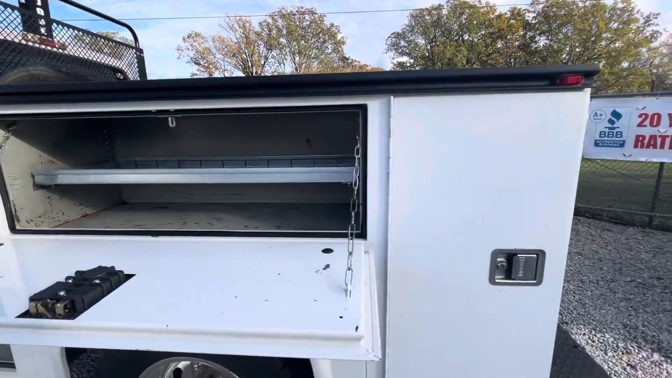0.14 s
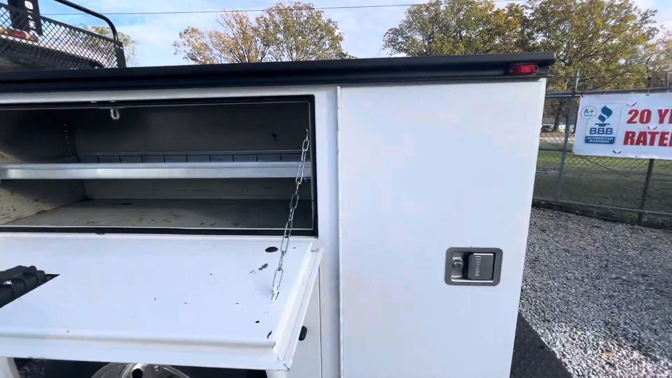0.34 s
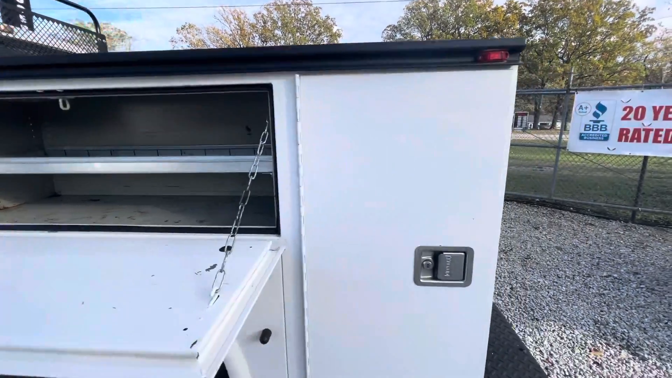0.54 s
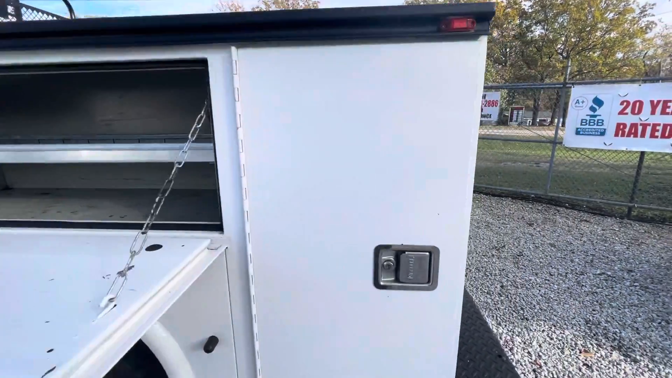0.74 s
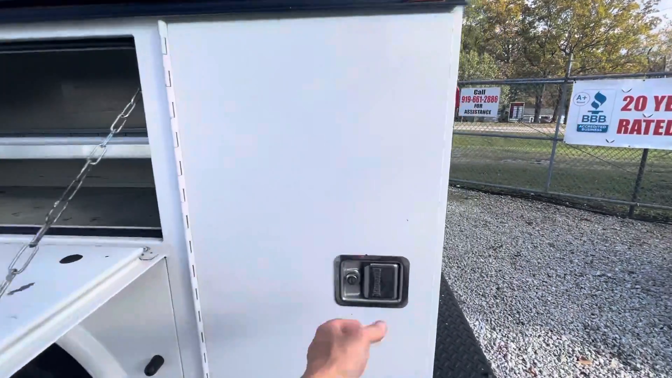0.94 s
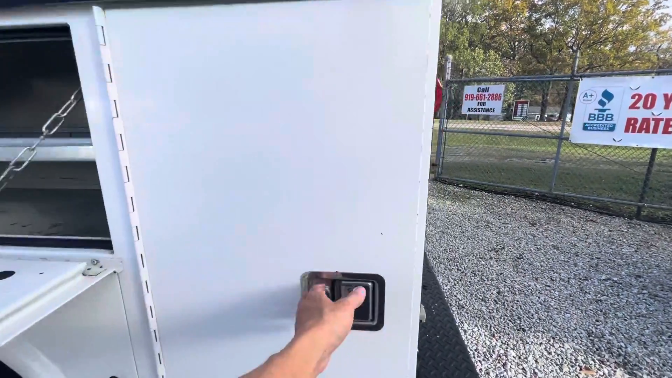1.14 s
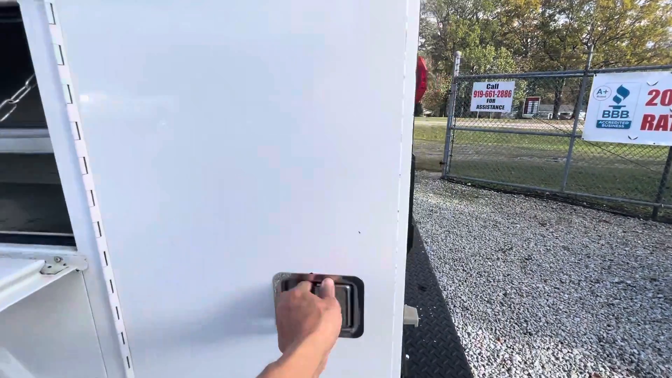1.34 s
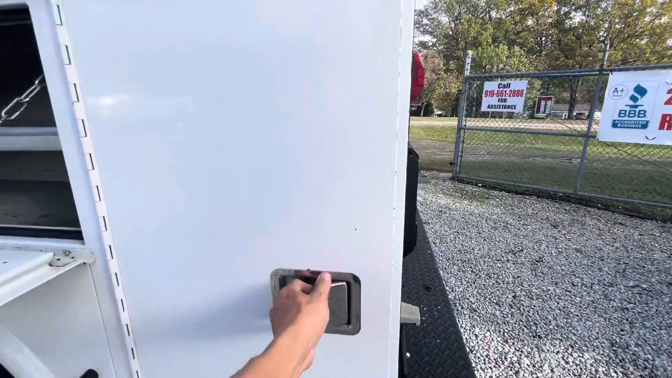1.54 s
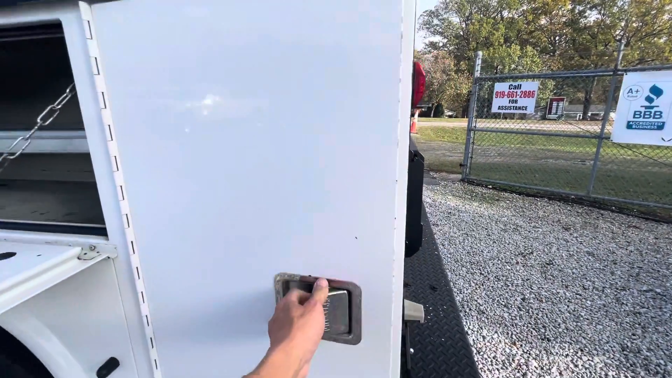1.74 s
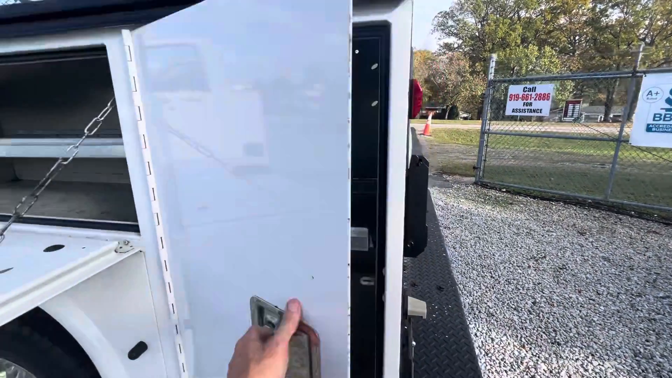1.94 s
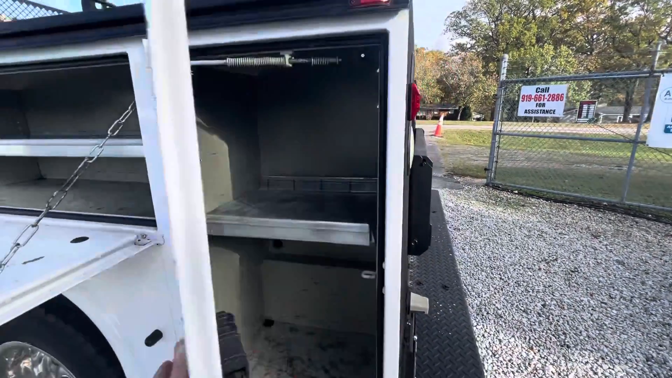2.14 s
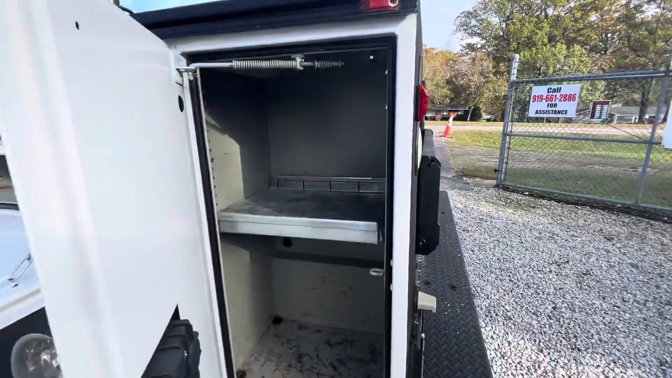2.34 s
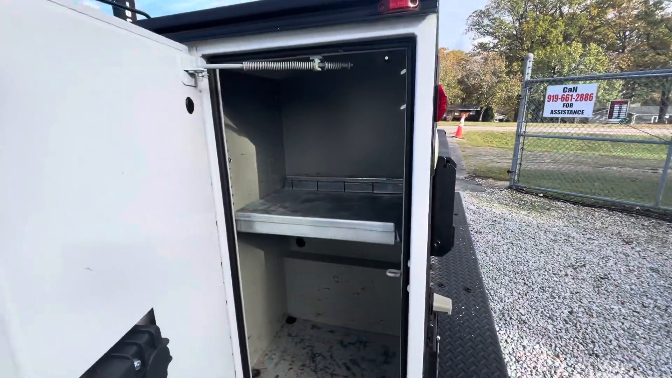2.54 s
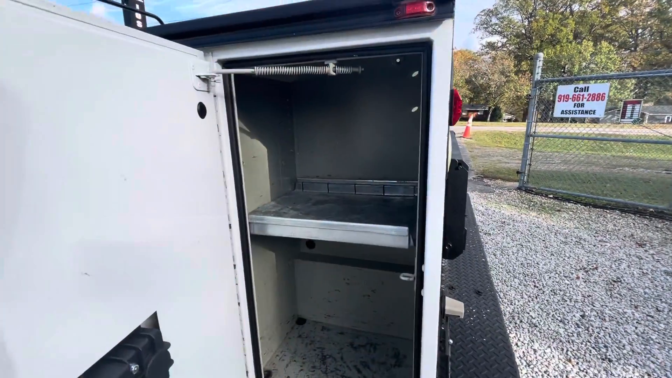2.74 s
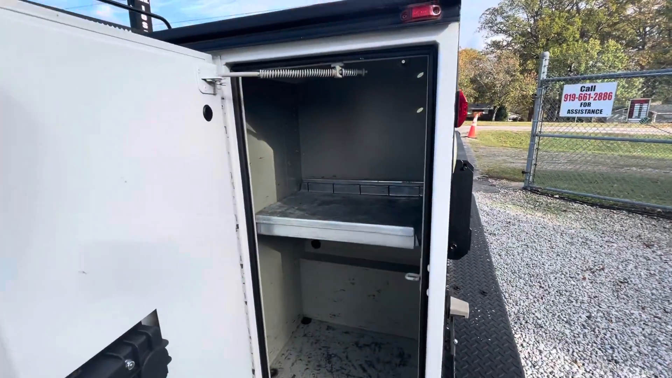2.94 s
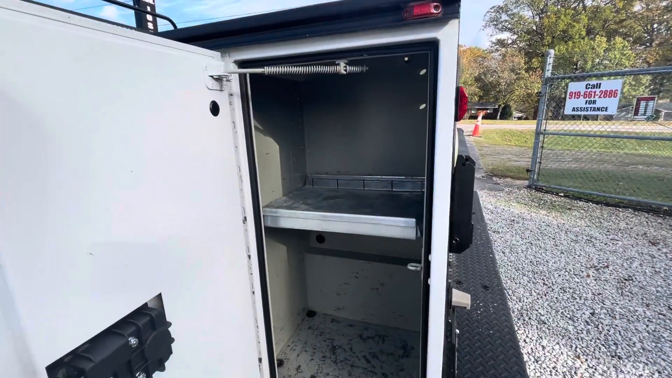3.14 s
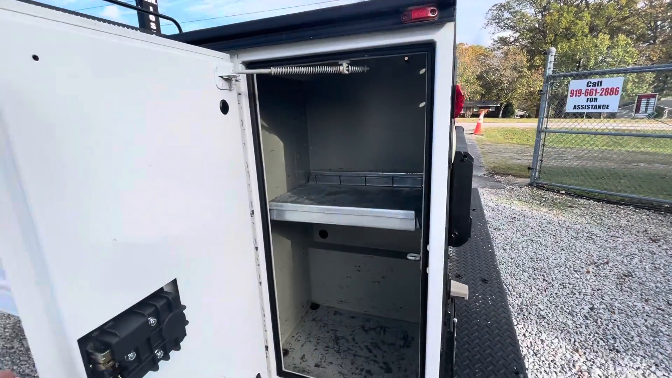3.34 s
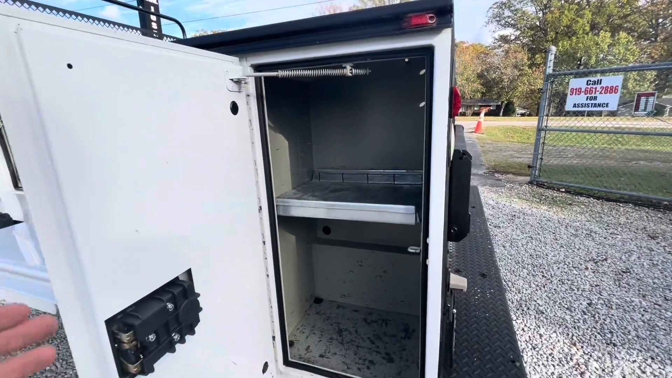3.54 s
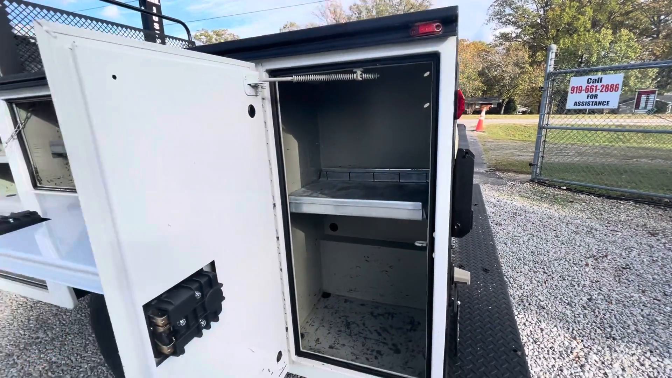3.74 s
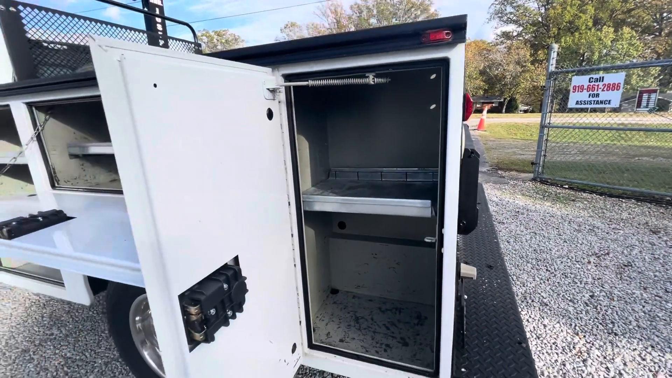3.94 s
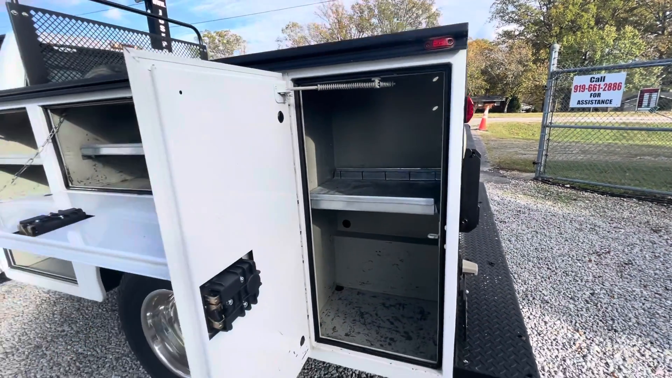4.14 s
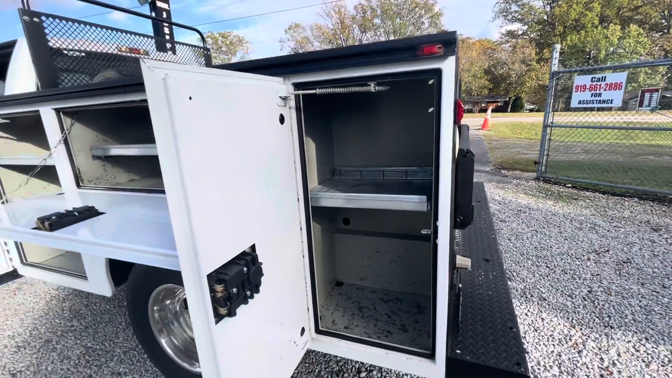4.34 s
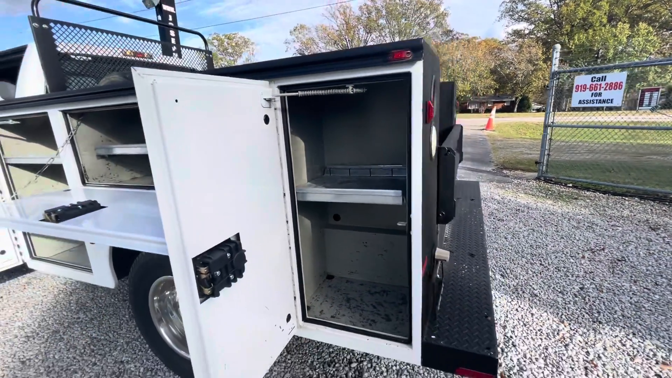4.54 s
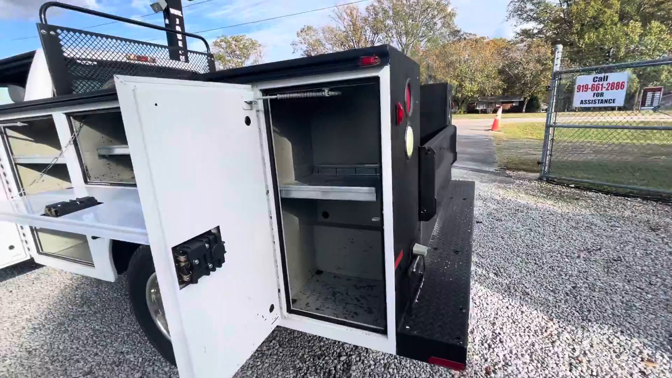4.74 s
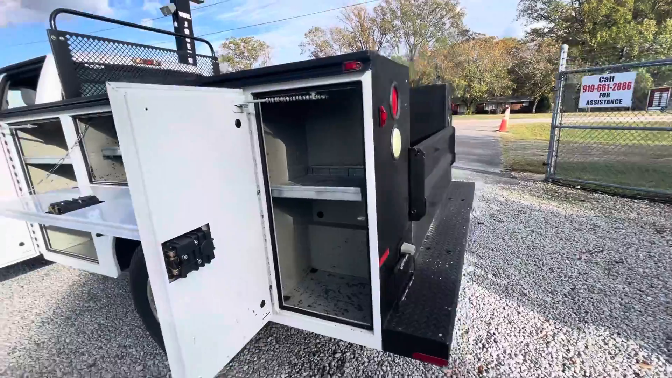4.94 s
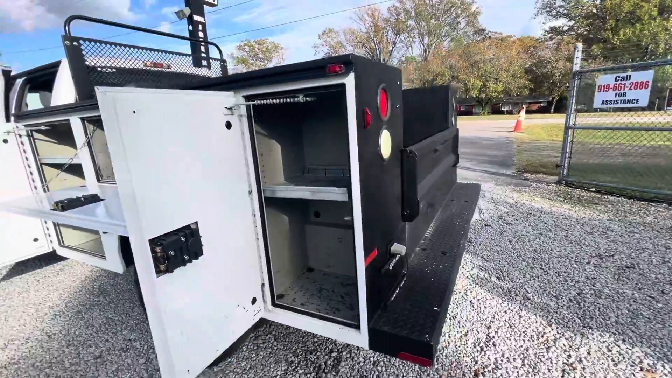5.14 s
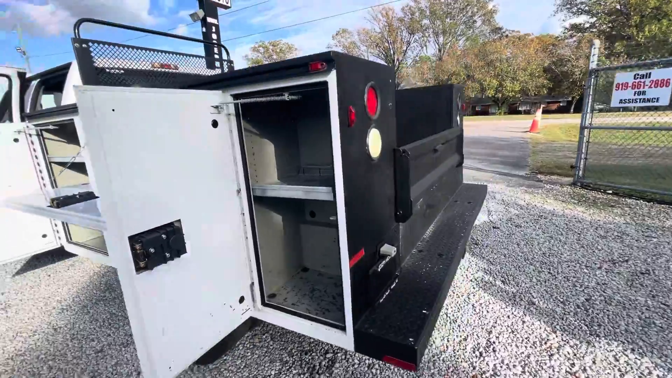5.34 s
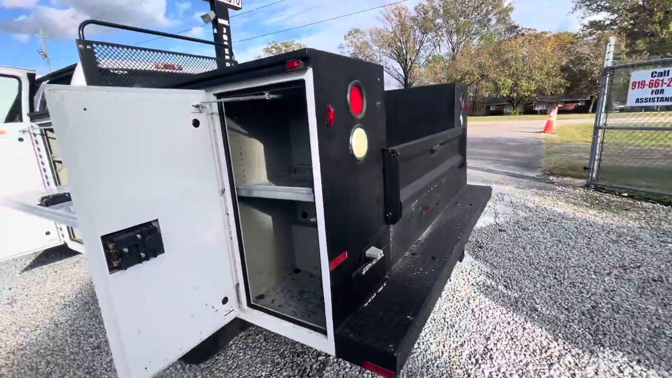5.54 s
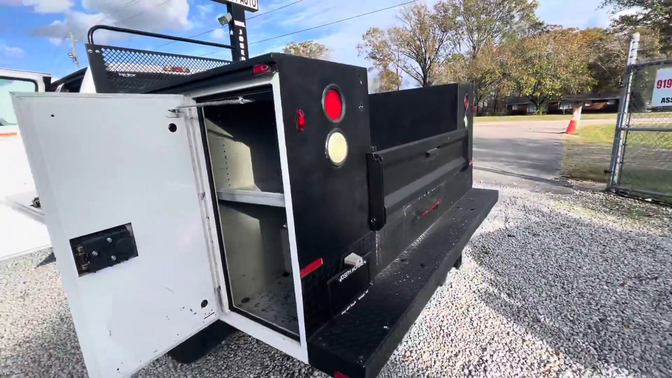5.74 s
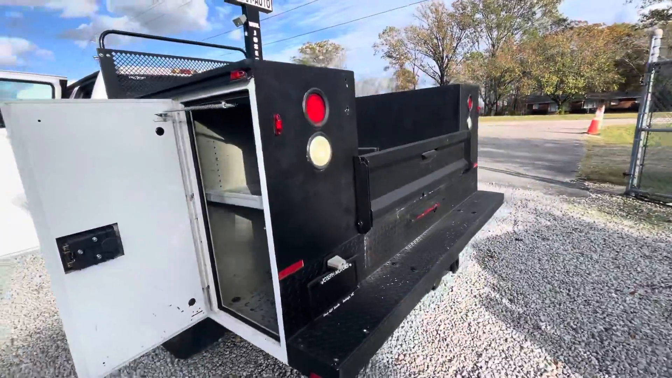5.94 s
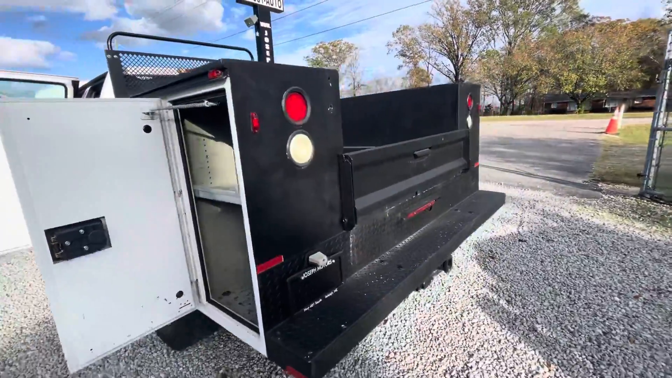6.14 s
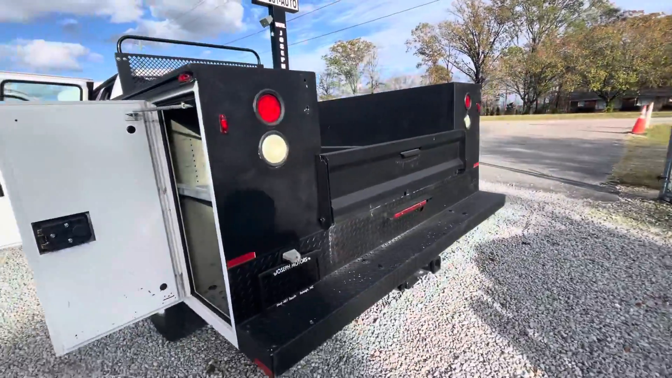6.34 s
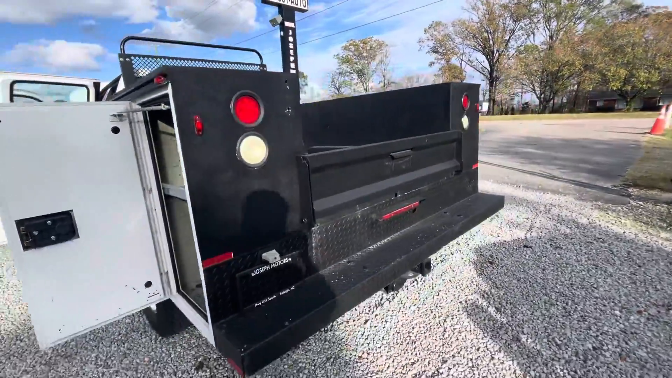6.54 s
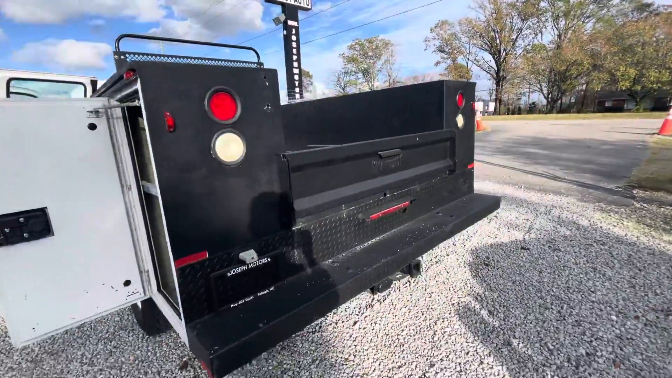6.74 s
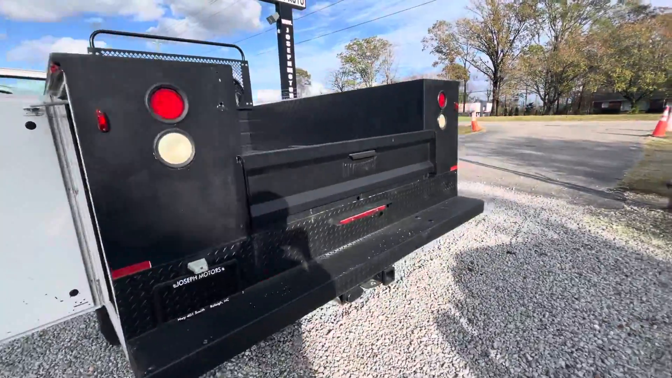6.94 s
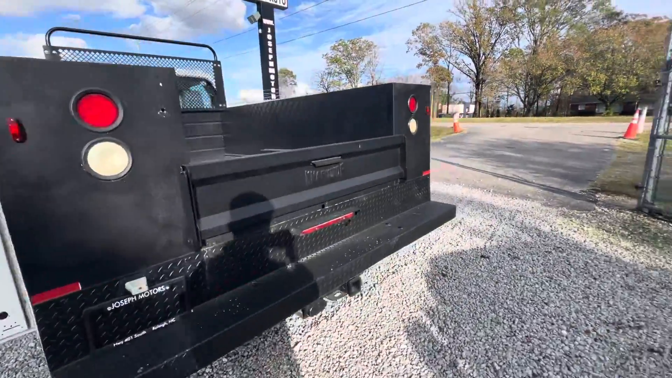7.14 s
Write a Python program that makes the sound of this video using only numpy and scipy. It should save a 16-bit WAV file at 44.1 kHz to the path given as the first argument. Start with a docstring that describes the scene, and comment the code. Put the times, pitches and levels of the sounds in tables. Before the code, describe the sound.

A handheld phone catches a quiet gravel lot with distant traffic rumble and soft engine hum. A soft low thump precedes the loudest event, a crisp steel latch snapping open. A low metallic moan follows as the door swings, ending in a small click and fading rattle. Faint engine clatter and whine emerge, then footsteps crunch and stones clack, busiest near the end.

```python
"""Distant road rumble, a nearby diesel's hum and gravel underfoot come first, heard by a phone's two ports.
Close by, a hand opens a parked truck's steel locker: the latch snaps, the panel groans, the stay clicks home.
The phone's holder then walks off over gravel, stones crunching and clacking underfoot.
Road, wind and gravel are shaped noise; the diesel is wavering tones and noise rattled once a stroke.
The door is struck decaying modes, noisy cracks and a sinking moan."""
import sys
import numpy as np
from scipy import signal
from scipy.fft import rfft, irfft, next_fast_len
from scipy.io import wavfile
from scipy.ndimage import uniform_filter1d

SR = 44100
rng = np.random.default_rng(int(sys.argv[2]) if len(sys.argv) > 2 else 0)


def store_wav(level_fs):
    """Save 16-bit WAV to argv[1]."""
    pcm = np.round(np.clip(np.atleast_2d(level_fs), -1, 1) * 32767)
    wavfile.write(sys.argv[1], SR, pcm.T.astype(np.int16))


N = 317074

# Surroundings as the phone moves: (time [s], rumble [dB], road roar [dB], wind on the ports [dB])
SURROUNDINGS = [(0.0, -41.5, -39, -33.5), (0.3, -42.5, -39, -39), (1.2, -37.5, -43, -64),
                (1.8, -37, -48.5, -45), (2.1, -38.5, -42, -48), (2.5, -42.5, -43.5, -56),
                (3.6, -39.5, -44, -52), (4.7, -40.5, -43.5, -53), (5.2, -40, -45.5, -63),
                (5.95, -41, -44.5, -65), (6.2, -42.5, -40.5, -43), (6.45, -38, -44.5, -44),
                (6.8, -42.5, -39, -38.5), (7.19, -44, -44.5, -47)]
# Spectrum of the far road's rumble: (frequency [Hz], relative density [dB])
RUMBLE_SPECTRUM = [(13, -38.5), (22, -16), (80, 5), (107, -4.5), (129, 3), (210, -21.5), (268, -5.5),
                   (329, -21.5), (400, -13), (520, -19), (880, -120)]
# Spectrum of the far road's roar: (frequency [Hz], relative density [dB])
ROAR_SPECTRUM = [(88, 0), (150, 2.5), (235, -7.5), (382, -9), (587, -18.5), (883, -11.5), (1750, -23.5),
                 (2390, -30), (5630, -40.5), (6840, -41.5), (9340, -58), (10700, -59), (13800, -61.5),
                 (15800, -100)]
# Stereo width of the sound: (frequency [Hz], side minus mid [dB])
STEREO_WIDTH = [(60, -15.5), (110, -14), (200, -10.5), (380, -8), (700, -4), (1290, -3.5), (2380, 1),
                (4400, -0.5), (9000, 1.5), (12500, -10)]
# Diesel hum lines: (frequency [Hz], level [dB], frequency waver [Hz])
HUM_LINES = [(39.8, -61, 2.1), (53.8, -45.5, 2.2), (66.3, -41.5, 2.16), (80.4, -46.5, 3.95),
             (106.5, -37, 2.04), (119.1, -50, 2.7), (377, -54.5, 6)]
# Nearby engine, screened by the truck at first: (time [s], clatter level [dB], whine level [dB])
ENGINE_LEVELS = [(0, -69, -94), (1.7, -68, -65), (2.2, -58.5, -52.5), (3, -53.5, -51.5), (4, -53.5, -53.5),
                 (4.6, -49, -54), (5, -58.5, -52.5), (5.3, -65.5, -90.5), (5.8, -58, -85),
                 (7.19, -57.5, -69)]
# Engine block resonances: (frequency [Hz], width [Hz], relative level [dB])
BLOCK_MODES = [(980, 580, 15), (1668, 244, 15.5), (1830, 220, 15.5), (2114, 220, 14.5), (2397, 140, 15.5),
               (4370, 1800, 2)]
# Spectrum of the grains underfoot: (frequency [Hz], relative density [dB])
GRAVEL_SPECTRUM = [(300, 8), (600, 7.5), (1300, 6.5), (2500, -11), (3700, -11.5), (6000, -10.5),
                   (9500, -13), (10500, -22.5)]
# Single pebbles snapping: (time [s], strength [dB], centre frequency [Hz])
PEBBLE_SNAPS = [(0.1334, -32.5, 6490), (0.195, -30.5, 5870), (.951, -36, 6800), (0.97, -32, 6370),
                (1.011, -36, 6500), (2.174, -27, 7000), (2.8346, -24, 4400), (2.946, -32, 9000),
                (3.4092, -34.5, 6890), (3.477, -41, 6700), (3.7652, -22.5, 6400), (3.7784, -36, 6680),
                (3.813, -14, 13600), (3.8786, -30, 4990), (3.896, -35, 4900), (4.4505, -29.5, 4500),
                (4.5331, -31.5, 8600), (4.651, -34, 5080), (5.692, -26.5, 7060), (5.8003, -29, 5200),
                (5.8311, -26.5, 7400), (5.9873, -40, 6130), (6.0067, -21, 6060), (6.022, -21, 2080),
                (6.0277, -16, 8190), (6.025, -21, 3960), (6.031, -19, 3480), (6.039, -26, 4300),
                (6.046, -23, 3840), (6.054, -31, 3600), (6.068, -29, 4000), (6.112, -35, 8200),
                (6.0497, -18, 8080), (6.058, -22, 6100), (6.16, -26, 8100), (6.354, -23, 4970),
                (6.517, -31, 5230), (6.5615, -30.5, 4950), (6.628, -32, 5300), (6.665, -26, 6140),
                (6.7337, -32, 4420), (6.7482, -28, 4450), (6.797, -25, 4900), (6.8196, -21, 5200),
                (6.8334, -20, 5200), (6.84, -27, 6200), (6.9076, -27.5, 6690), (7.0573, -23.5, 6300),
                (7.117, -32.5, 6640)]
# Larger stones clacking: (time [s], strength [dB], pitch [Hz], left minus right [dB])
STONE_CLACKS = [(2.543, -19, 1130, 0), (3.803, -19.5, 715, 3), (3.813, -25.5, 1510, 1),
                (3.927, -19, 913, 4), (4.713, -26.5, 900, -4.5), (5.232, -32.5, 1110, 3),
                (5.435, -25.5, 1300, 2), (6.129, -36, 1800, 2), (6.171, -25, 1245, 2.0),
                (6.181, -32.5, 1160, -4), (6.193, -28.5, 1080, -1), (6.224, -25.5, 950, -2),
                (6.356, -21.5, 925, 1), (6.39, -20, 893, 0), (6.482, -33, 1160, 5),
                (6.501, -26.5, 1145, -1), (6.528, -22.5, 1225, 5), (6.562, -25.5, 950, 2),
                (6.574, -27, 820, 1), (6.668, -23, 994, 4), (6.767, -25, 1160, 0), (6.783, -25.5, 980, -2),
                (6.794, -22, 750, -2), (6.8177, -20.5, 1316, 1), (6.908, -31.5, 1890, 3)]
# Modes of a clacking stone: (multiple of its pitch, relative level [dB], t60 [s])
STONE_MODES = [(1.001, 0.4, 0.016), (1.124, -22.5, 0.17), (0.81, -19, 0.089)]
# Crunches under a sole: (time of peak [s], level [dB], swell [s], fade [s],
# coarse stones relative to grit [dB], dust relative to grit [dB])
SOLE_CRUNCHES = [(0.142, -44, 0.063, 0.18, -20, -10), (0.534, -61, .04, .03, 11, -14),
                 (0.734, -49.5, 0.091, 0.37, 4.5, -6), (0.976, -48.5, 0.23, 0.072, 1.5, -11),
                 (1.804, -50.5, 0.17, 0.084, 3.5, -8), (2.006, -43, 0.051, 0.049, 3.5, -5),
                 (2.14, -48, .07, 0.75, 3.5, -6), (2.83, -48.5, 0.11, 0.2, -13, -6),
                 (3.41, -56.5, 0.056, 0.19, 4, -10), (3.781, -39.5, 0.052, 0.037, 2.5, -7),
                 (3.819, -32.5, 0.034, 0.046, -3.5, -6), (3.89, -48.5, .09, 0.088, -3, -8),
                 (4.46, -40, 0.018, 0.027, -6, -16), (4.54, -43, 0.14, 0.047, -0.5, -19),
                 (4.82, -58.5, 1, 0.18, 6, -13), (5.29, -54.5, 0.094, 0.034, 7, -17),
                 (5.357, -48, 0.034, 0.13, 3, -5), (5.61, -53, 0.97, 0.11, 8, -8),
                 (5.69, -41.5, 0.011, 0.062, 2.5, -7), (5.84, -48.5, 0.51, 0.093, -14, -12),
                 (6.008, -33, 0.018, 0.16, -1.5, -2), (6.031, -36.5, 0.037, 0.32, -2, -15),
                 (6.15, -52, 0.12, 0.26, 11.5, -12), (6.27, -52.5, 0.33, 0.096, -1, 0),
                 (6.36, -47, 0.061, 0.1, -13, -9), (6.53, -55.5, 0.13, 0.83, 6.5, -20),
                 (6.67, -49, 0.033, 0.021, 14.5, -15), (6.77, -41, 0.12, 0.24, 1, -11),
                 (6.84, -41.5, 0.21, 0.027, 2.5, -11), (6.88, -50, 0.045, 0.61, 3, -12),
                 (7.06, -46.5, .03, 0.025, -5, -11), (7.19, -47, 0.096, 0.09, -4, -17)]
# Faint rustle beneath the crunches: (time [s], grit [dB], coarse stones [dB], dust [dB])
RUSTLE_LEVELS = [(0, -66, -43.5, -65), (0.1, -67.5, -70, -72), (1.0, -60, -54.5, -71), (1.5, -73, -55, -74),
                 (1.75, -56, -53, -59), (2.08, -51.5, -48, -51.5), (2.3, -61, -63, -61),
                 (2.6, -54.5, -54, -58.5), (2.74, -66.5, -58, -69), (2.9, -61, -52, -62),
                 (3.35, -66.5, -58, -73.5), (4.1, -75, -52.5, -76.5), (5.2, -71.5, -61.5, -76.5),
                 (5.5, -63.5, -55, -64), (5.95, -65, -55.5, -90), (6.4, -61, -53.5, -74),
                 (7.19, -75, -71, -80)]
# Balance of the noisy gravel at the ports: (time [s], left minus right [dB])
GRAVEL_BALANCE = [(0.0, -0.5), (1.2, -0.5), (2.3, -1.5), (3.5, 0), (5.85, 1), (7.19, 0.5)]
# Times at which the handle takes up its slack: [s]
PADDLE_TIMES = (1.524, 1.5275, 1.531)
# Handle modes: (frequency [Hz], level [dB], t60 [s])
PADDLE_MODES = [(960, -23, 0.02), (1350, -22.5, 0.02), (1900, -32, 0.02), (6300, -40, 0.02)]
# Latch blows: (time [s], strength [dB], treble strength [dB])
LATCH_STRIKES = [(1.543, -34, -27), (1.5474, -27, -3), (1.5494, -22, -3), (1.5516, -14.5, -18),
                 (1.557, -31, -21), (1.573, -37, -30), (1.583, -36, -34), (1.605, -31, -34),
                 (1.613, -34, -38), (1.624, -32, -38)]
# Latch and door skin modes: (frequency [Hz], relative level [dB], t60 [s])
LATCH_MODES = [(175, -3, 0.04), (238, 3, .04), (303, 3, 0.04), (385, -16, 0.15), (440, -5, .04),
               (646, -8, 0.15), (914, -11.5, 0.031), (1140, -12, 0.036), (1675, -1, .03),
               (2070, -17.5, 0.032), (2610, -16, 0.04), (3900, -14, 0.015), (4800, -6, .025),
               (4950, -21, .1), (6100, -22, 0.12), (6700, -5, .025), (7970, -17, .12), (8335, -10, .1),
               (8404, -8, .09), (8400, 14.5, .011), (8684, -13, .1), (8985, -17, .12), (14450, -21.5, .06)]
# The stay clicks home and rattles: (time [s], strength [dB], treble strength [dB])
STAY_STRIKES = [(2.0991, -25.5, -23), (2.109, -28.5, -44), (2.121, -30, -54), (2.15, -30.5, -52),
                (2.1763, -34, -56), (2.205, -33, -54), (2.25, -32.5, -58)]
# Stay modes: (frequency [Hz], relative level [dB], t60 [s])
STAY_MODES = [(265.6, -7.5, 0.14), (1124, -10.5, 0.14), (1324, -10.5, 0.058), (540, -10.5, 0.16),
              (1530, -9, 0.04), (1970, -9.5, 0.035), (2440, -7, 0.043), (2670, -11, .03),
              (4780, -5.5, 0.024), (6340, -13, 0.033), (9400, 5, 0.0099), (10470, 14.5, 0.0075),
              (13400, 2, .01)]
# Door skin flexing as it swings: (time [s], lowest mode [dB], lowest mode [Hz], higher modes [dB])
DOOR_SWING = [(1.6, -58, 235, -50), (1.69, -44, 240, -40), (1.72, -33, 235, -39), (1.75, -42, 215, -37),
              (1.79, -35, 200, -38), (1.86, -36, 182, -42), (1.925, -34.5, 182, -44), (1.96, -37, 182, -43),
              (2.02, -50, 180, -48), (2.11, -50, 180, -46), (2.28, -62, 180, -62)]
# Higher door skin modes: (frequency [Hz], width [Hz], relative level [dB])
SKIN_MODES = [(225, 50, -1), (285, 55, -1), (390, 75, 0), (480, 60, -2), (600, 130, -3)]
# Soft thumps, a hand on the door and a heel on the ground, before smoothing:
# (time [s], frequency [Hz], level [dB], t60 [s], rise [s])
SOFT_THUMPS = [(1.145, 62.7, -19.5, 0.4, 0.0087), (6.542, 141, -17.5, 0.055, 0.0017)]
# Port resonances of the phone's microphones: (frequency [Hz], gain [dB])
PORT_RESPONSE = [(3500, 0.5), (4900, -1), (5600, -5), (6500, 2), (7500, -4.5), (8400, 0), (9800, -2),
                 (10900, -9), (12500, -3.5)]

STROKE_HZ, FIRST_STROKE_S = 20.0, 0.042  # engine strokes
SLOWER_FROM_S, SLOWER_BY_HZ = 3.9, 0.2  # strokes come slightly slower from here on
WHINE_HZ = 1685
TICK_HZ, TICK_WIDTH_HZ, TICK_DB, TICK_S = 5050, 700, -15.5, 0.005  # a small part; dB relative to rattle
SWELL_DB = 30  # change in level over one swell or fade time of a crunch
STAY_CRACK_DB = -24
TOP_HZ = 15800  # the treble is cut above this


def undb(db):
    """Amplitude from decibels."""
    return 10 ** (np.asarray(db) / 20)


def unit(x):
    """Scale to rms 1."""
    return x / np.sqrt(np.mean(x ** 2))


def curves(rows):
    """Columns of a time table, interpolated to one value per sample."""
    times, *columns = np.transpose(rows)
    return [np.interp(np.arange(N) / SR, times, column) for column in columns]


def held(rows):
    """The last column, gliding in a straight line from event to event."""
    return curves([(row[0], row[-1]) for row in rows])[0]


def colour(x, points, turn=1):
    """Weight a sound by a (frequency [Hz], level [dB]) spectrum and turn its phase."""
    hz, db = np.transpose(points)
    size = next_fast_len(N)
    log_hz = np.log(np.fft.rfftfreq(size, 1 / SR) + 1)
    gain = undb(np.interp(log_hz, np.log(hz), db))
    return irfft(rfft(x, size) * gain * turn, size)[..., :N]


def band(x, hz, width):
    """Resonance with gain 1 at the centre."""
    return signal.lfilter(*signal.iirpeak(hz, hz / width, fs=SR), x)


def walk(rate):
    """Random levels held 1 / rate s and smoothed twice; rms 1."""
    hold = int(SR / rate)
    steps = np.repeat(rng.standard_normal(N // hold + 1), hold)
    return unit(uniform_filter1d(uniform_filter1d(steps, hold), hold)[:N])


def wide(mid, other, pan_db=0):
    """Left and right from a mid sound and a second one that enters them with opposite sign."""
    side = colour(other, STEREO_WIDTH)
    return np.array([(mid + side) * undb(pan_db / 2), (mid - side) * undb(-pan_db / 2)])


def near(x, pan_db=0):
    """A close source reaches the two ports slightly out of step: a quarter-cycle turned side copy enters them
    with opposite sign."""
    return wide(x, colour(x, [(1, 0), (SR, 0)], turn=1j), pan_db)


def ring(start_s, modes, rise=0.00017):
    """Decaying sines (frequency [Hz], level [dB], t60 [s]) struck once."""
    out, first = np.zeros(N), int(start_s * SR)
    for hz, db, t60 in modes:
        t = np.arange(min(N - first, int(t60 * SR))) / SR
        envelope = undb(db - 60 * t / t60) * (1 - np.exp(-t / rise))
        out[first:first + len(t)] += envelope * np.sin(2 * np.pi * hz * t)
    return out


def burst(start_s, db, t60):
    """Envelope of a crack: quick rise, exponential tail, at most a quarter second."""
    out, first = np.zeros(N), int(start_s * SR)
    t = np.arange(min(N - first, SR // 4)) / SR
    out[first:first + len(t)] = undb(db - 60 * t / t60) * (1 - np.exp(-t / 0.0004))
    return out


def grains(rate, spread_db, tail_s, floor):
    """Envelope of random little impacts over a steady rub; rms 1."""
    hits = (rng.random(N) < rate / SR) * undb(spread_db * rng.exponential(size=N))
    decaying = signal.lfilter([1], [1, -np.exp(-1 / (tail_s * SR))], hits)
    return unit(unit(decaying) + floor)


def road():
    """Far traffic, low rumble and flickering roar bands, with light wind unrelated at the two ports."""
    rumble_db, roar_db, wind_db = curves(SURROUNDINGS)
    rumble = unit(colour(rng.standard_normal((2, N)), RUMBLE_SPECTRUM)) * undb(rumble_db)
    hiss = colour(rng.standard_normal((2, N)), ROAR_SPECTRUM)
    roar = 0
    for hz in 200 * 2.0 ** np.arange(7):
        roar = roar + band(hiss, hz, hz * 1.66) * undb(0.74 * walk(11.0))
    wind_spectrum = [(22, -39.0), (36, 9), (50, 14.5), (80, -8.5), (200, -48.0)]
    wind = unit(colour(rng.standard_normal((2, N)), wind_spectrum))
    traffic = rumble + unit(roar) * undb(roar_db)
    return wide(*traffic, -0.46) + wind * undb(wind_db)


def diesel():
    """Nearby engine: wavering hum lines, a gear whine, and block resonances rattled once a stroke."""
    t = np.arange(N) / SR
    clatter_db, whine_db = curves(ENGINE_LEVELS)
    hum = 0
    for hz, db, waver_hz in HUM_LINES:
        level = undb(db + 0.38 * walk(6.5))
        hum = hum + level * np.sin(2 * np.pi * np.cumsum(hz + waver_hz * walk(5.6)) / SR)
    strokes = (t - FIRST_STROKE_S) * STROKE_HZ - SLOWER_BY_HZ * np.maximum(t - SLOWER_FROM_S, 0)
    strokes = strokes + 0.006 * walk(2)
    phase = strokes % 1
    # every stroke has its own strength
    strength = undb(0.9 * rng.standard_normal(N // 1000))[np.floor(strokes).astype(int) + 1]
    gate = strength * (1 - np.exp(-phase / 0.04)) * np.exp(-phase / 0.3)
    whine_level = undb(whine_db + 2.5 * walk(19)) * (0.45 + gate)
    whine = whine_level * np.sin(2 * np.pi * np.cumsum(WHINE_HZ + 12 * walk(15)) / SR)
    # the same parts knock in the same order every stroke, with some fresh scatter
    knocks = rng.standard_normal((2, SR))[:, (phase * SR / STROKE_HZ).astype(int)]
    excitation = gate * (knocks + 0.98 * rng.standard_normal((2, N)))
    rattle = 0
    for hz, width, db in BLOCK_MODES:
        rattle = rattle + undb(db) * band(band(excitation, hz, 1.5 * width), hz, 1.5 * width)
    tick = strength ** 3 * np.exp(-phase / STROKE_HZ / TICK_S) * knocks
    tick = unit(band(band(tick, TICK_HZ, TICK_WIDTH_HZ), TICK_HZ, TICK_WIDTH_HZ))
    clatter = (unit(rattle) + undb(TICK_DB) * tick) * undb(clatter_db)
    # a shifted copy of the hum as side sound makes the two channels differ
    side_hum = undb(0.5) * np.roll(hum, SR // 3)
    return wide(hum, side_hum, -0.47) + near(whine, -1.44) + wide(*clatter, -3.5)


def underfoot():
    """Envelopes of grit, coarse stones and dust: crunches swell and fade over the rustle, powers adding."""
    t = np.arange(N) / SR
    power = undb(curves(RUSTLE_LEVELS)) ** 2
    for peak_s, db, swell_s, fade_s, coarse_db, dust_db in SOLE_CRUNCHES:
        away = np.where(t < peak_s, (peak_s - t) / abs(swell_s), (t - peak_s) / abs(fade_s))
        shape = undb(db - SWELL_DB * away)
        power = power + (shape * undb([[0], [coarse_db], [dust_db]])) ** 2
    return np.sqrt(power)


def gravel():
    """Close underfoot: dense noise grains, lone snapping pebbles and stones ringing as they clack."""
    grit_env, coarse_env, dust_env = underfoot()
    grit = colour(rng.standard_normal((2, N)), GRAVEL_SPECTRUM)
    coarse, fine = 0, 0
    # stones of each size knock in their own band at their own moments
    for hz in (609, 959, 1438, 2300, 2834, 4030):
        stones = band(band(grit, hz, hz * 0.91), hz, hz * 1.2)
        coarse = coarse + stones * grains(300, 0.79, 0.0045, 0.59) * undb(-6 * (hz < 2000))
    for hz in (5000, 6500, 8400):
        fine = fine + band(band(grit, hz, hz * 0.68), hz, hz * 0.68) * grains(500, 4.3, 0.006, 0.47)
    dust_spectrum = [(9000, -41.0), (10500, -0.5), (14500, 0.5), (16000, -30.5)]
    dust = colour(rng.standard_normal((2, N)), dust_spectrum)
    bed = unit(fine) * grit_env + unit(coarse) * coarse_env + unit(dust) * dust_env
    bed = bed * grains(800, 2.7, 0.00089, 2.7)
    white, snaps = rng.standard_normal((2, N)), np.zeros((2, N))
    for s, db, hz in PEBBLE_SNAPS:
        part = slice(int(s * SR), int(s * SR) + SR // 4)
        crack = white[:, part] * burst(s, db, 0.043)[part]
        snaps[:, part] += band(crack, hz, 0.12 * hz) + undb(-16) * crack
    # each pebble also pings briefly
    pings = sum(ring(s, [(hz, db - 23.0, 0.016)]) for s, db, hz in PEBBLE_SNAPS)
    # a dead stone rings for a few cycles; two fainter modes last longer
    clacks = 0
    for s, db, pitch, _ in STONE_CLACKS:
        clacks = clacks + ring(s, [(k * pitch, db + gain, t60) for k, gain, t60 in STONE_MODES])
    # the contact itself is a short, broad scrape
    scrape_env = sum(burst(s, db - 13.5, 0.025) for s, db, _, _ in STONE_CLACKS)
    scrape = band(band(white, 1600, 2400), 1600, 2400) * scrape_env
    noisy = wide(*(bed + snaps + scrape), curves(GRAVEL_BALANCE)[0])
    return noisy + near(clacks + pings, held(STONE_CLACKS))


def groaning_skin():
    """The swinging door skin flexes: its lowest mode sinks as it slackens while higher ones rumble."""
    push = rng.standard_normal(N)
    moan_db, lowest_hz, rumble_db = curves(DOOR_SWING)
    moan_level = undb(moan_db + 2.5 * walk(35))
    moan = moan_level * np.sin(2 * np.pi * np.cumsum(lowest_hz + 9 * walk(40)) / SR)
    rumble = sum(undb(db) * unit(band(band(push, hz, w), hz, w)) for hz, w, db in SKIN_MODES)
    return moan + unit(rumble) * undb(rumble_db)


def door():
    """Close steel door: handle, latch and stay ring their modes with noisy cracks; the skin groans."""
    modes = sum(ring(s, PADDLE_MODES, rise=0.002) for s in PADDLE_TIMES)
    tail = sum(burst(s, -42, 0.1) for s in PADDLE_TIMES)
    crack, jangle = 0, 0
    for s, db, treble_db in LATCH_STRIKES:
        # a harder contact drives the small parts above 3 kHz
        lift_db = treble_db - db - 13.0
        struck = [(hz, db + gain + (hz > 3000) * lift_db, t60) for hz, gain, t60 in LATCH_MODES]
        modes = modes + ring(s, struck, rise=0.001)
        crack = crack + burst(s, treble_db - 6.0, 0.0056)
        tail = tail + burst(s, db - 12.5, 0.16)
        jangle = jangle + burst(s, treble_db - 31.0, 0.27)
    stay_s = STAY_STRIKES[0][0]
    crack = crack + burst(stay_s, STAY_CRACK_DB, 0.013)
    tail = tail + burst(stay_s, STAY_CRACK_DB - 14, 0.57)
    stay = 0
    for s, db, treble_db in STAY_STRIKES:
        struck = [(hz, gain + (treble_db if hz > 3000 else db), t60) for hz, gain, t60 in STAY_MODES]
        stay = stay + ring(s, struck)
    white = rng.standard_normal((2, N))
    body_spectrum = [(120, -16), (300, 13.5), (1500, 2.5), (3000, -5.0), (7000, -8.5), (15000, -13.5)]
    body = unit(colour(white, body_spectrum))
    # the rattle sounds through the same resonances as the blows
    body = unit(sum(band(body, hz, 0.11 * hz) for hz, _, _ in LATCH_MODES if hz < 7000))
    # loose springs and plates buzz as a dense cluster near 8.6 kHz
    buzz = unit(band(band(white, 8600, 1000), 8600, 1000)) * grains(230, 3.1, 0.004, 0.94)
    groan = groaning_skin()
    thump = sum(ring(s, [(hz, db, t60)], rise) for s, hz, db, t60, rise in SOFT_THUMPS)
    thump = uniform_filter1d(thump, size=100)
    noisy = white * crack + body * tail * grains(400, 2.0, 0.005, 1.2) + buzz * jangle
    return near(modes, -2.5) + near(stay, -0.54) + wide(*noisy, -2.3) + near(groan + thump)


def scene():
    """Everything that reaches the phone, from the far road to the close door."""
    return road() + diesel() + gravel() + door()


def record(dry):
    """The phone's ports colour the treble, peaks are softly rounded and the top is cut."""
    rounded = np.tanh(0.6 * colour(dry, PORT_RESPONSE)) / 0.6
    return signal.sosfilt(signal.ellip(10, 0.2, 70, TOP_HZ, fs=SR, output="sos"), rounded)


dry = scene()
out = record(dry)
store_wav(out)
```